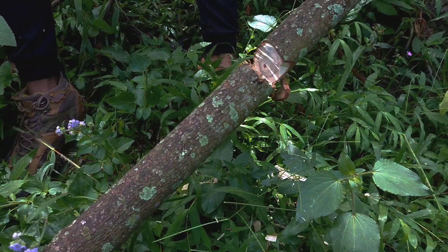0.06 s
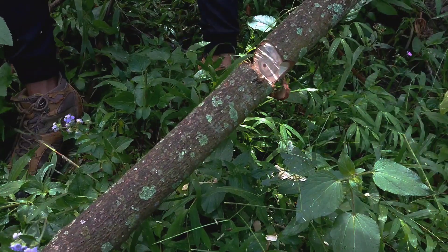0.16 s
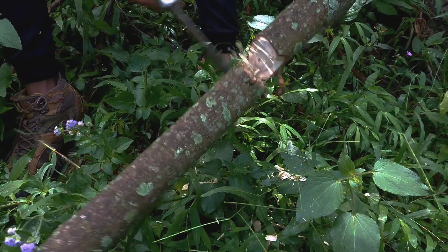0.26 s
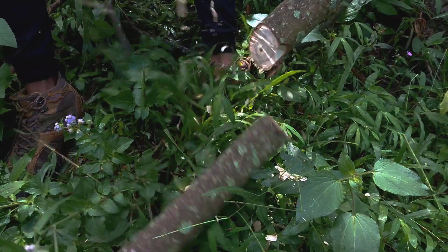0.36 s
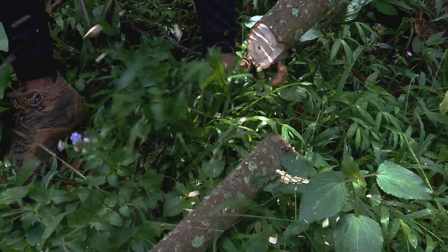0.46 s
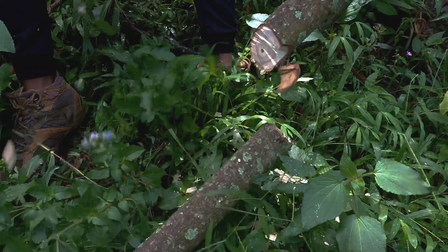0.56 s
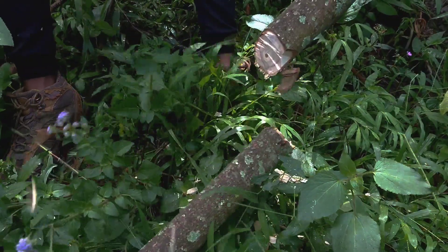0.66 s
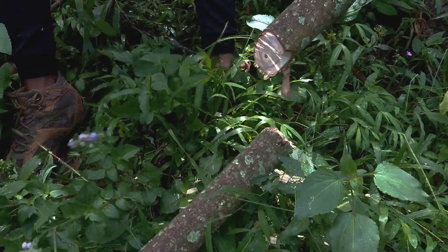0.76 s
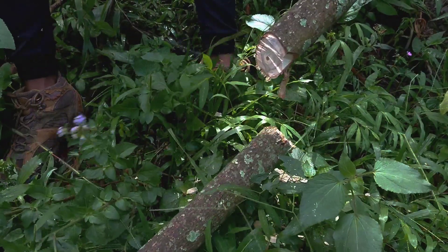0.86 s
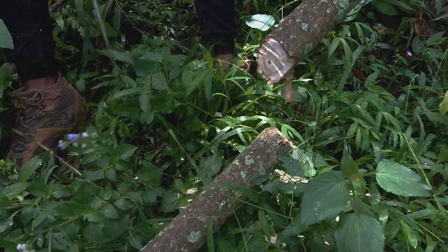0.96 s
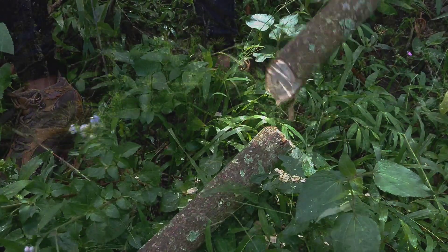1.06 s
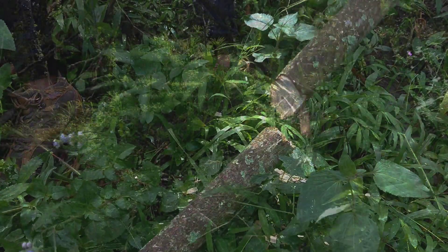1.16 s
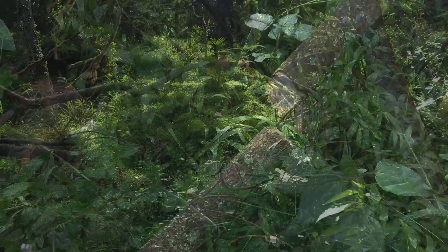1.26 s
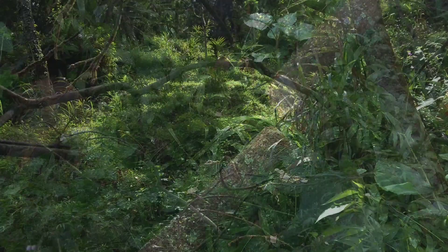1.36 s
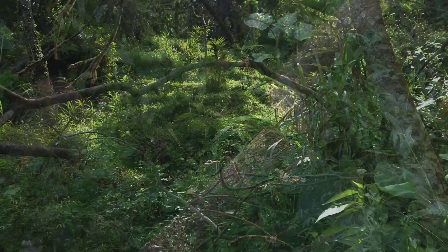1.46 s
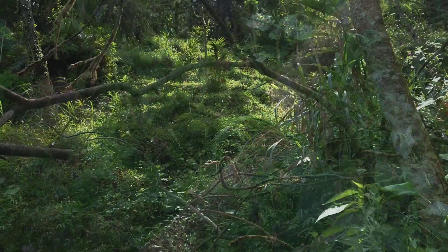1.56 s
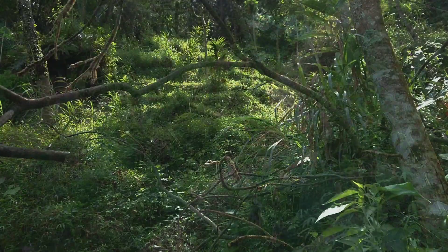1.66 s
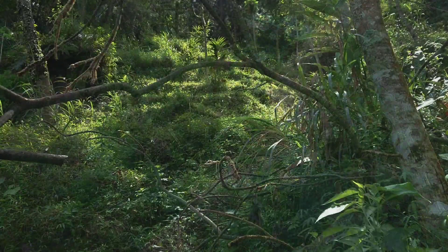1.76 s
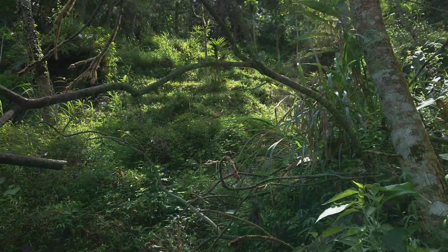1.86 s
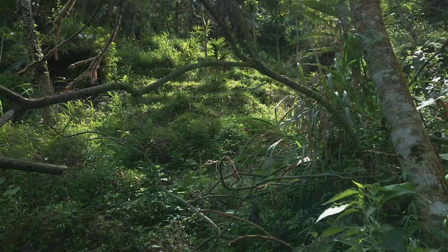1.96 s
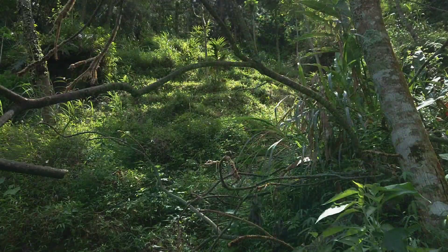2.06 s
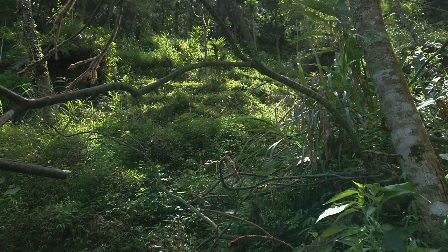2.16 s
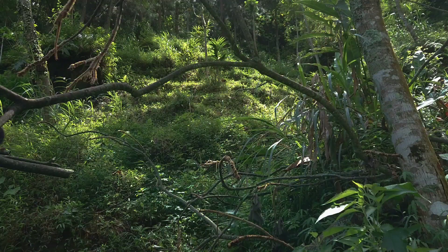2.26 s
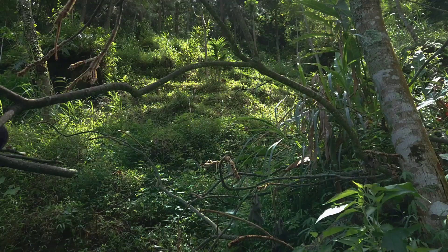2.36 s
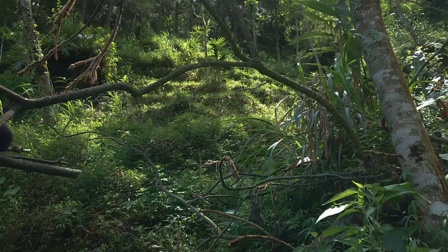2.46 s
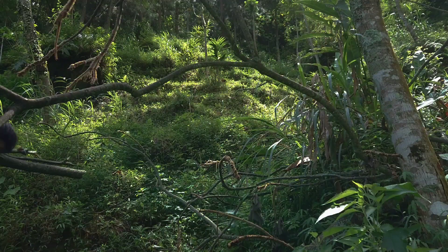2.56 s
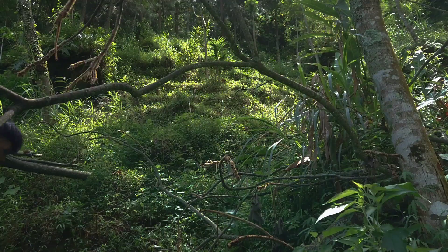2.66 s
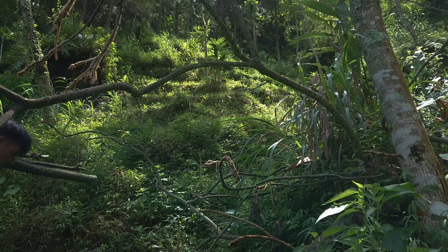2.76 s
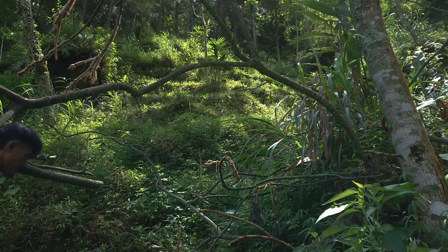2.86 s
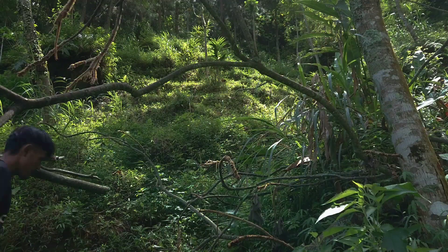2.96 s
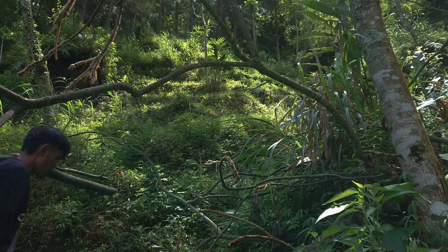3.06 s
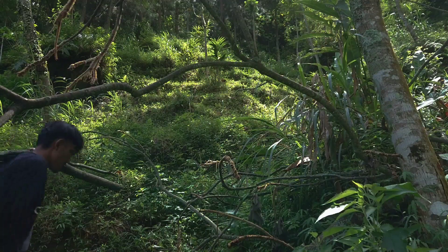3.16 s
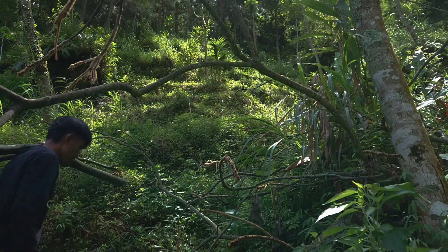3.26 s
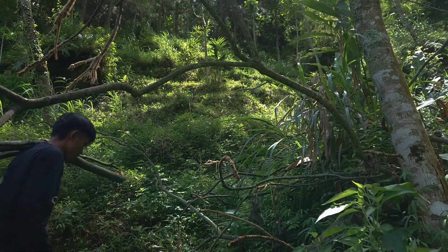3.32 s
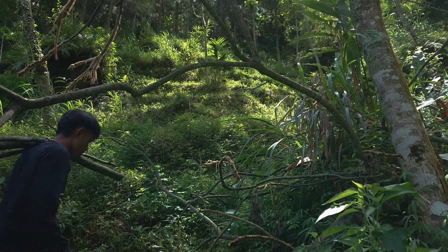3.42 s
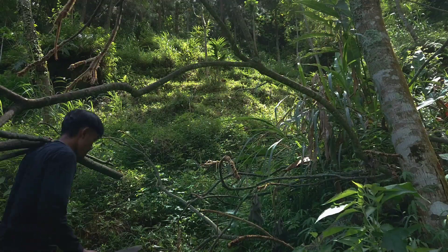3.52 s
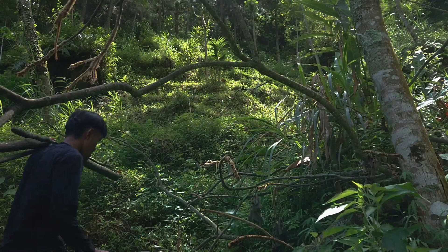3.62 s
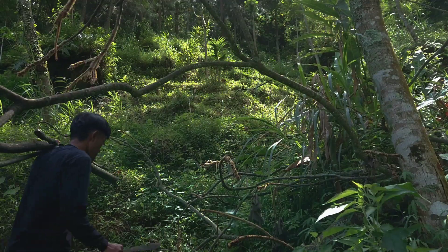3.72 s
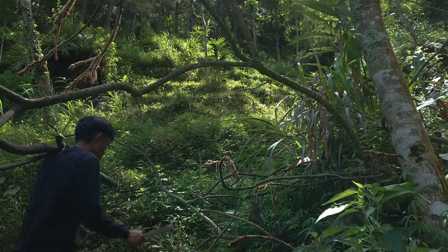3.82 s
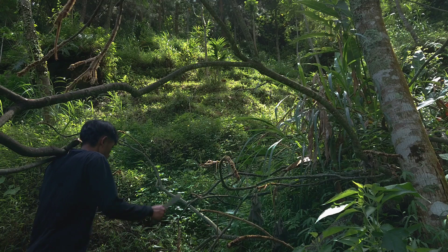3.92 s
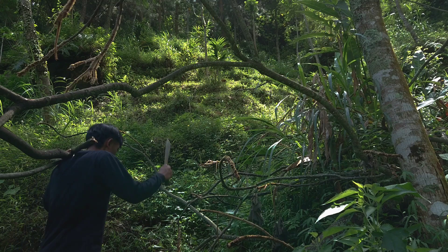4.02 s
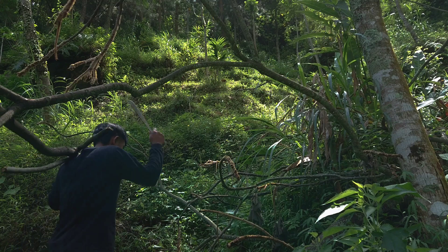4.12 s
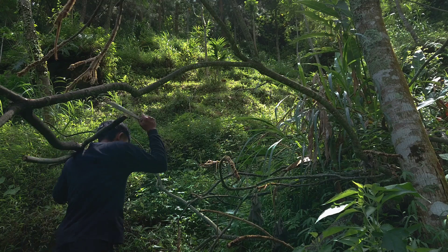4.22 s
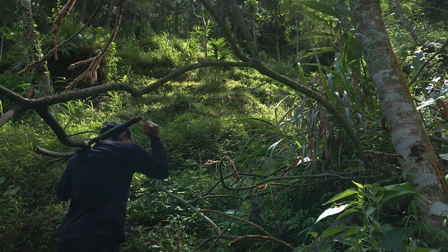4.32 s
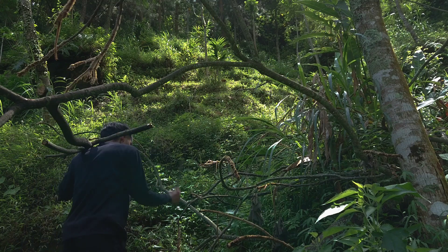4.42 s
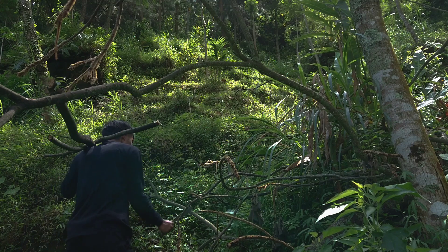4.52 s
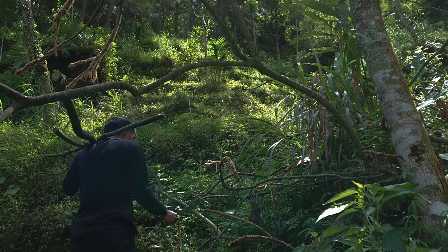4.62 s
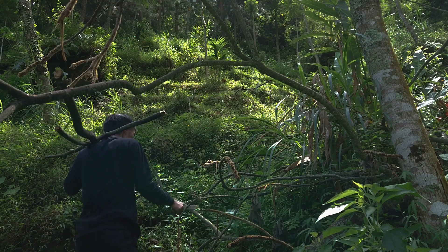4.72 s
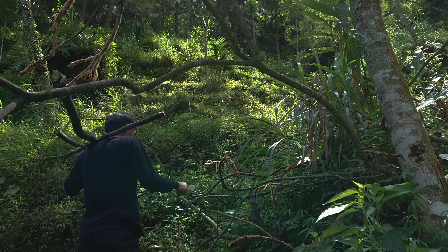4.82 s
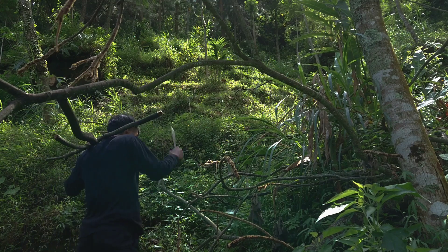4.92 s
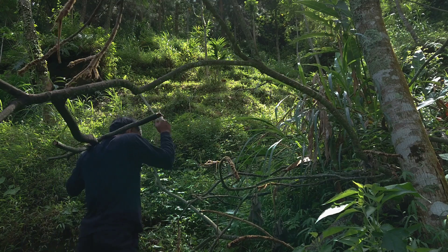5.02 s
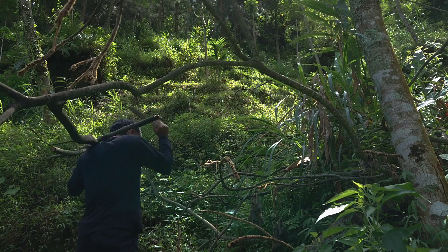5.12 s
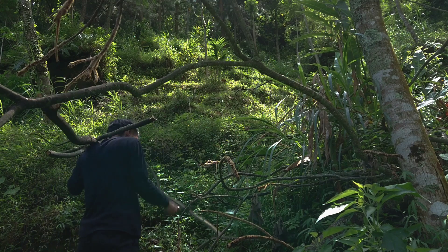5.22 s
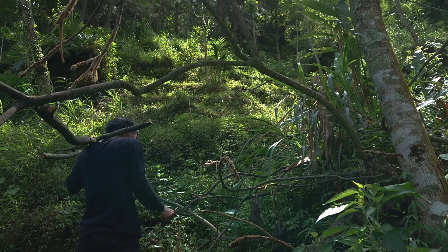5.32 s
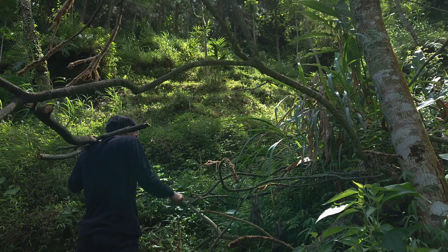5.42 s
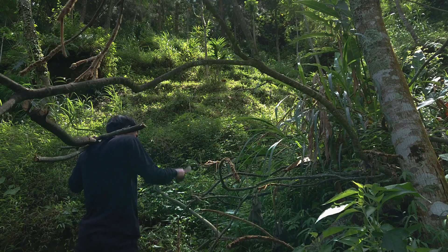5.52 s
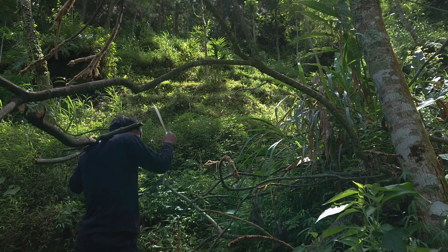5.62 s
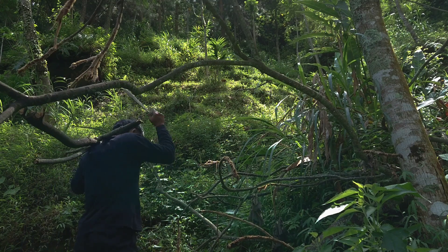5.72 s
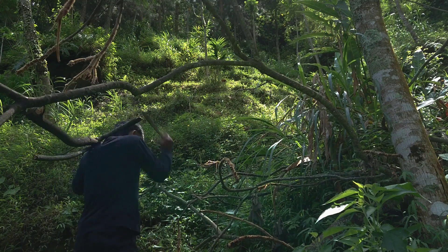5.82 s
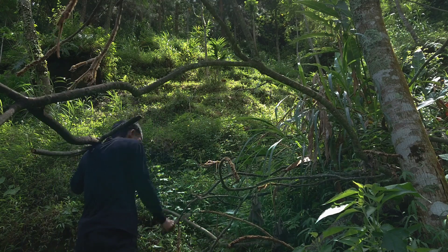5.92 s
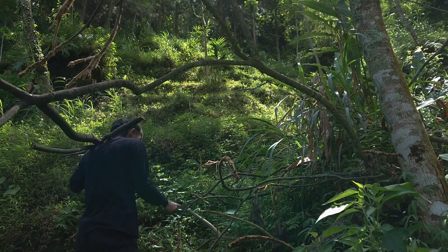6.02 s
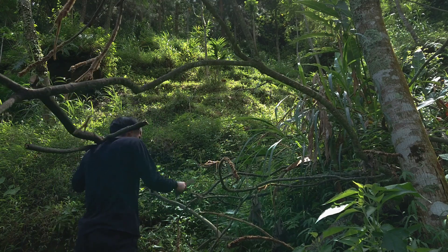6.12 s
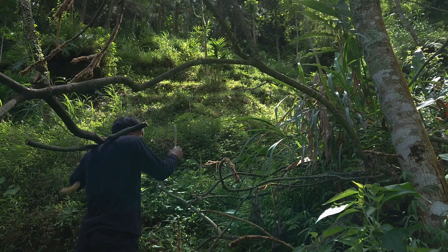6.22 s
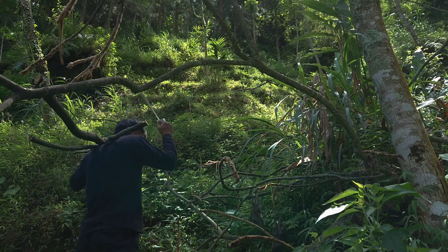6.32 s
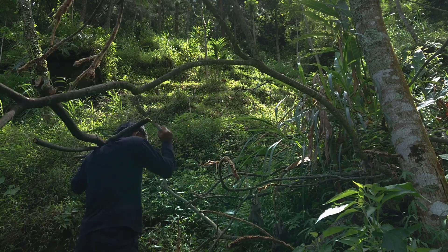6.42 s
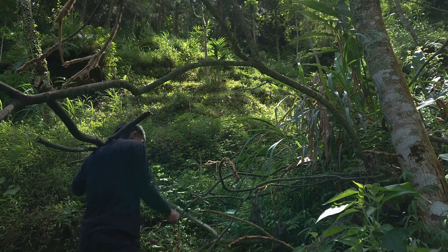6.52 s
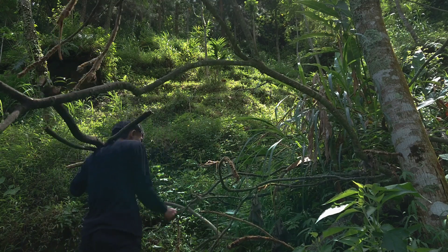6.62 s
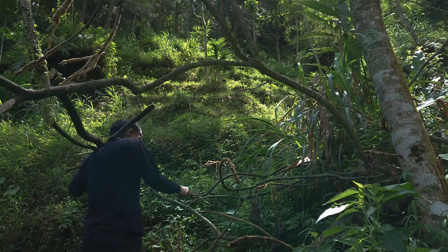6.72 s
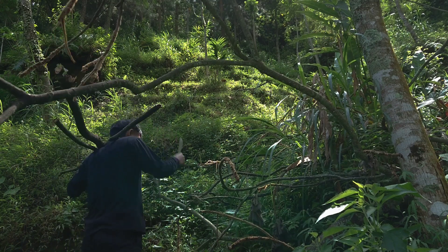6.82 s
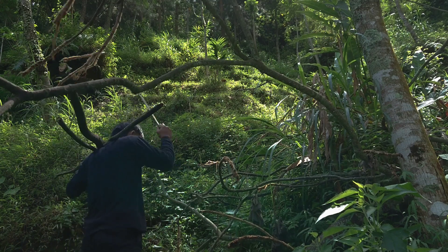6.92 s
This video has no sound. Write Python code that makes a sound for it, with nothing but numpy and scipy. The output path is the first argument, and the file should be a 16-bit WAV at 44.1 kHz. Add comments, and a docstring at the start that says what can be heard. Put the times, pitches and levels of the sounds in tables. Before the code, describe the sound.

A quiet forest wash opens, with a very faint rooster crowing far off to the right until about 1.2 seconds. At 0.4 seconds a machete cuts a sapling close by: fibres crack sharply, wood and blade ring briefly and the ground thuds. Leaves rustle and settle over the next second, and a small bird gives one faint chirp on the left near 1.5 seconds. At 1.7 seconds the background switches to another part of the forest, where a throbbing cicada chorus fades up, leaning left, over a faint wavering low hum. Foliage stirs softly between about 2 and 4 seconds. Four chops then bite into a branch a little further off, at about 4.6, 5.4, 6.1 and 6.7 seconds, each a woody crack with a short metallic ring and a shake of leaves. The cicadas continue to the end, near 7 seconds.

```python
"""A far rooster crows as a machete cuts a sapling close by: fibres crack, wood and blade ring, the
ground thuds. Leaves rustle and settle, and a small bird chirps. At 1.7 s the scene moves to another
part of the forest, with a throbbing cicada chorus on the left and a faint low drone. From 4.6 s, four
chops bite into a branch further off and shake its leaves.
Two spaced microphones: bass alike on both sides, treble mostly unlike."""
import sys
import numpy as np
from scipy import signal
from scipy.fft import rfft, irfft
from scipy.io import wavfile
from scipy.ndimage import uniform_filter1d

SR = 44100
rng = np.random.default_rng(int(sys.argv[2]) if len(sys.argv) > 2 else 0)


def dump_mix(stems):
    """Bounce the given channels to the path in sys.argv[1] as a 16-bit WAV at rate SR."""
    frames = np.atleast_2d(stems).T  # one column per channel
    limited = np.clip(frames, -1, 1)  # hard clip at full scale
    pcm = np.round(limited * 32767).astype(np.int16)
    wavfile.write(sys.argv[1], SR, pcm)


N = 307818
TIME_S = np.arange(N) / SR
PLACE_CHANGE_S = 1.699


def gain_of(db):
    """Decibels to gain."""
    return 10 ** (np.asarray(db) / 20)


def stereo(left_db, right_db):
    """Gain column for the two sides."""
    return gain_of([[left_db], [right_db]])


def unit_rms(x):
    """Scales to rms 1."""
    return x / np.sqrt(np.mean(x ** 2) + 1e-20)


def at_hz(points, hz):
    """Interpolates a table over log frequency."""
    point_hz, value = np.transpose(points)
    return np.interp(np.log(hz + 1), np.log(point_hz + 1), value)


def at_time(rows, t):
    """Interpolates each column of a table over time."""
    row_s, *columns = np.transpose(rows)
    return [np.interp(t, row_s, column) for column in columns]


def add(mix, start_s, sound):
    """Mixes in a stereo sound."""
    part = mix[:, round(start_s * SR):][:, :sound.shape[1]]
    part += sound[:, :part.shape[1]]


def wavering(rate_hz, waver, t):
    """A cosine whose rate drifts."""
    drift = unit_rms(sum(np.sin(2 * np.pi * (f * t + rng.random())) for f in np.geomspace(.5, 8, 12)))
    return np.cos(2 * np.pi * np.cumsum(rate_hz * (1 + waver * drift)) * (t[1] - t[0]))


def tone(curve, partials=((1, 0),), waver=0., flutter_db=0.):
    """An unsteady, soft-ended tone along (s, Hz, dB) points, with (multiple, dB) partials."""
    t = np.arange(curve[0][0], curve[-1][0], 1 / SR)
    hz, db = at_time(curve, t)
    noise = rng.standard_normal((2, len(t)))
    drift, flutter = unit_rms(uniform_filter1d(uniform_filter1d(noise, size=900), size=900))
    turns = np.cumsum(hz * (1 + waver * drift)) / SR
    wave = sum(gain_of(partial_db) * np.sin(2 * np.pi * k * turns) for k, partial_db in partials)
    soft_ends = signal.windows.tukey(len(t), min(1, 900 / len(t)))
    return np.sqrt(2) * gain_of(db + flutter_db * flutter) * wave * soft_ends


def syllable(start_s, length_s, first_hz, last_hz, level_db, change_db):
    """Tone curve of a bird's note: pitch and level hold at first, then slide."""
    progress = np.linspace(0, 1, 9)
    slide = progress ** 1.9
    hz = first_hz + (last_hz - first_hz) * slide
    return np.transpose([start_s + length_s * progress, hz, level_db + change_db * slide])


# Likeness of the two microphones. Each row: frequency in Hz, coherence from 0 to 1.
MIC_COHERENCE = [(100, .97), (300, .89), (600, .5), (1100, .2), (2000, .05), (8000, .03)]

def hiss(colour, size, lag_s=0., coherence=MIC_COHERENCE):
    """Stereo noise from random short-time spectra of gain colour(hz, t); the right side lags."""
    hop = size // 4
    hz, t = np.fft.rfftfreq(size, 1 / SR)[:, None], np.arange(N // hop + 5) * hop / SR
    re1, im1, re2, im2, patches = rng.standard_normal((len(t), len(hz), 5)).T
    patches = uniform_filter1d(patches, size // 64, axis=0)
    patches_db = .5 * unit_rms(uniform_filter1d(patches, 8192 // size, axis=1))
    shared = at_hz(coherence, hz)
    left = re1 + 1j * im1
    right = shared * left + np.sqrt(1 - shared ** 2) * (re2 + 1j * im2)
    right *= np.exp(-2j * np.pi * hz * lag_s)
    spectra = np.array([left, right]) * colour(hz, t) * gain_of(patches_db)
    return signal.istft(spectra, nperseg=size, noverlap=size - hop)[1][:, :N] / np.sqrt(8 * size / 3)


# Air spectrum of the first place. Each row: frequency in Hz, relative level in dB.
FIRST_AIR = [(25, -34), (40, -15), (60, -5.5), (130, -3.5), (220, -14), (400, -16.5), (700, -21.5),
             (1100, -24), (2000, -30.5), (4700, -30.5), (6500, -39.5), (8500, -43.5), (10500, -37.5),
             (15400, -38.5)]

def first_air():
    """Distant forest wash, fading by 13 dB a second after 1.05 s."""
    def colour(hz, t):
        level_db = -46 - 13 * np.maximum(t - 1.05, 0)
        return unit_rms(gain_of(at_hz(FIRST_AIR, hz))) * gain_of(level_db)
    return hiss(colour, size=2048)


# Crow syllables. Each row: start and length in seconds, first and last pitch in Hz,
# level and its change in dB.
CROW = [(.11, .08, 678, 680, -73, -4), (.215, .23, 686, 686, -71, 1.5), (.63, .17, 699, 694, -77, -1.5),
        (.85, .39, 692, 632, -71, -10)]

def rooster():
    """A far crow on the right, its octave stronger than its fundamental."""
    out = np.zeros((2, N))
    for row in CROW:
        note = tone(syllable(*row), partials=[(1, -1.5), (2, 0)], waver=.003, flutter_db=1.5)
        add(out, row[0], note * stereo(-2.5, 2.5))
    return out


# Spectrum of splitting wood. Each row: frequency in Hz, relative level in dB.
CRACK_SPECTRUM = [(150, -31.5), (300, -8), (1000, 1.2), (2000, -0.26), (3500, -3), (4400, -3), (6500, -9.5),
                  (8500, -18), (10000, -13.5), (12000, -12.5), (14300, -19.5), (16300, -27)]
# Blade bites and fibre snaps. Each row: start in seconds, level in dB, tilt in dB per octave,
# t60 in seconds, relative tail in dB, left over right in dB, pitch in Hz.
FIBRE_CRACKS = [(0.3983, -3, 2.3, 0.016, -16, 1, 2650), (0.4007, 1.5, -0.3, 0.012, -33, -1, 1200),
                (0.403, -2.5, .1, 0.014, -29, 7, 4200), (0.4074, .5, 4.5, 0.0063, -27, -9, 4300),
                (0.4098, -11, .1, .01, -28, 8, 4110), (0.4991, -35, -1, 0.0076, -15, -2.1, 2230),
                (0.924, -48, 1.5, 0.0099, -12, 2, 2640), (1.048, -51, 3.5, 0.01, -16, 1, 9960),
                (4.6245, -5.5, -2, 0.0087, -18, 0.4, 2323), (5.4033, -5, -.1, 0.0095, -16, -1.7, 2172),
                (5.4084, -12, -6.5, 0.0093, -29, 11, 1900), (6.0765, -8, .5, 0.0078, -13, -0.3, 1900),
                (6.0775, -12, 1.5, .007, -16, .3, 6200), (6.6992, -5, -1, 0.0095, -18.5, 2.5, 1500),
                (6.7146, -29, 4, 0.0053, -11, 2.1, 11300), (6.788, -34, 0, 0.0077, -10, -1, 4360)]

def cracks():
    """Fibres split in noise bursts, each with a short tail scattered by trunks and ground."""
    out, size = np.zeros((2, N)), 6000
    t, hz = np.arange(size) / SR, np.fft.rfftfreq(size, 1 / SR)
    attack = (1 - np.exp(-t / .0007)) ** 2
    for start_s, level_db, tilt, t60, tail_db, pan_db, pitch_hz in FIBRE_CRACKS:
        both, left, right = rng.standard_normal((3, size))
        bump_db = 7.1 * np.exp(-(np.log2((hz + 50) / pitch_hz) / .43) ** 2)
        colour = gain_of(at_hz(CRACK_SPECTRUM, hz) + tilt * np.log2((hz + 50) / 3000) + bump_db)
        noise = unit_rms(irfft(rfft(np.array([left, right]) + .63 * both) * colour))
        decay = gain_of(-60 * t / t60) + gain_of(tail_db - 60 * t / .064)
        add(out, start_s, noise * attack * decay * gain_of(level_db) * stereo(pan_db / 2, -pan_db / 2))
    return out


def ring(modes, level_db, left_lag_ms, build_cycles=1.7):
    """Struck modes build and die away; each side hears them at a slightly different phase."""
    t = np.arange(9000) / SR
    hz, db, t60 = np.transpose(modes)[:, :, None]
    phase = rng.uniform(0, 2 * np.pi, hz.shape)
    skew = .1 * rng.standard_normal(hz.shape)
    choke_db = 150 * (t / t60) ** 3  # green wood and the grip damp the late ring
    attack = (1 - np.exp(-t * hz / build_cycles)) ** 2
    envelope = attack * gain_of(level_db + db - 60 * t / t60 - choke_db)
    left = np.sin(2 * np.pi * hz * (t - left_lag_ms / 1000) + phase + skew)
    right = np.sin(2 * np.pi * hz * t + phase)
    return (envelope * np.array([left, right])).sum(axis=1)


# Modes of the struck bodies. Each row: frequency in Hz, relative level in dB, base t60 in seconds.
SAPLING_MODES = [(125, -8.5, .09), (174, -5, .09), (243, -11, .11), (345, -7, 0.04), (452, -1, .11),
                 (620, 4, 0.046), (740, 3, .06), (880, 2.5, .05), (1137, 9, .025)]
BRANCH_MODES = [(152, -2.5, 0.091), (226, -13, 0.13), (286, -6, 0.13), (350, -3, 0.12), (412, -9, .1),
                (457, -5, 0.1), (528, -4, 0.09), (607, -5, 0.06), (672, -4, 0.05)]
BLADE_MODES = [(790, -3.04, .15), (960, -3.5, .07), (1394, 1.7, 0.033), (1800, -6.5, 0.032),
               (2480, -9.5, .04), (2870, -14, 0.022), (3450, -14.5, .025), (4250, -18.5, .03)]
GROUND_MODES = [(65, 4.2, .25), (95.5, -1.0, .38)]
# Machete blows. Each row: start in seconds, wood, blade and ground levels in dB, left lag in ms,
# blade t60 factor, blade treble cut in dB per octave.
MACHETE_BLOWS = [(.399, -21.5, -30, -42, 0.096, 0.66, 4), (.422, -41, -54.5, -67, -0.26, 1.01, 1.5),
                 (4.625, -21.5, -19.5, -36, 0.16, .95, -1), (5.404, -23, -28.5, -36.5, 0.11, 1.3, 3),
                 (5.432, -32.5, -29.5, -57, 0.23, 0.75, 6), (6.079, -23, -16.5, -38.5, 0.18, 0.87, 1.5),
                 (6.701, -26, -18, -35, 0.1, 0.65, -3), (6.752, -46, -43, -56, 0.11, 0.74, 1),
                 (6.758, -43, -37, -45, .15, .6, 2), (6.764, -41, -33, -38, .2, .5, 2)]

def blows():
    """Each blow rings the wood (sapling, later branch) and the blade, and jolts the ground."""
    out = np.zeros((2, N))
    for start_s, wood_db, blade_db, ground_db, lag_ms, t60_factor, treble_cut in MACHETE_BLOWS:
        wood, build_cycles = (SAPLING_MODES, .6) if start_s < PLACE_CHANGE_S else (BRANCH_MODES, 1.1)
        blade = [(hz, db - treble_cut * np.log2(hz / 800), t60 * t60_factor)
                 for hz, db, t60 in BLADE_MODES]
        add(out, start_s, ring(wood, wood_db, lag_ms, build_cycles))
        add(out, start_s, ring(blade, blade_db, lag_ms))
        add(out, start_s, ring(GROUND_MODES, ground_db, left_lag_ms=0))
    return out


# Leaf spectrum. Each row: frequency in Hz, relative level in dB.
LEAF_SPECTRUM = [(200, -30), (400, -8.5), (800, -6.5), (1200, -10.5), (2500, -6.5), (4300, -7),
                 (6500, -13.5), (8500, -15), (10000, -10.5), (15000, -9.5), (16000, -23)]
# Leaves shaken or brushed. Each row: peak time in seconds, level in dB, tilt in dB per octave,
# seconds per 20 dB of rise, t60 in seconds.
LEAF_RUSTLES = [(.43, -36, 1.2, .01, .4), (.504, -40.5, -1.6, .18, .6), (.6, -50, .8, .2, 1.6),
                (1.05, -60, -1.5, .02, .5), (1.19, -66, -5, .08, .8), (2.25, -61, 4, .06, 2.5),
                (3.0, -58, 6, .25, 1.2), (3.44, -53, -3.5, .3, .45), (3.96, -50, 3, .2, .2),
                (4.64, -40, -6, .015, .26), (4.78, -49, -1.5, .2, .28), (5.42, -41, -.8, .015, .42),
                (6.1, -39.5, .2, .015, .6), (6.19, -47, -1, .15, .3), (6.72, -41, 2.7, .015, .42),
                (6.8, -55, 4, .1, .7)]

def leaves():
    """Many leaf touches merge into wide noise that swells, flickers and dies away."""
    def colour(hz, t):
        peak_s, db, tilt, rise_s, t60 = np.transpose(LEAF_RUSTLES)[:, :, None]
        swell_db = db + np.where(t < peak_s, 20 * (t - peak_s) / rise_s, -60 * (t - peak_s) / t60)
        power = gain_of(2 * tilt.T * np.log2((hz + 50) / 8000)) @ gain_of(2 * swell_db)
        flicker_db = 1.5 * rng.standard_normal(len(t))
        return unit_rms(gain_of(at_hz(LEAF_SPECTRUM, hz))) * np.sqrt(power) * gain_of(flicker_db)
    return hiss(colour, size=256)


def chirp():
    """One quick falling note from a small bird on the left."""
    out, start_s = np.zeros((2, N)), 1.46
    curve = syllable(start_s, length_s=.038, first_hz=5450, last_hz=4450, level_db=-70, change_db=-4)
    add(out, start_s, tone(curve) * stereo(2.2, -3))
    return out


# Fade-in of the second place. Each row: time in seconds, share of the opening dip left.
OPENING_DIP = [(1.7, 1), (1.8, .65), (2.05, .75), (2.35, .1), (2.7, 0)]

def fade_in(t, from_db):
    """Gain rising unevenly from from_db to unity."""
    return gain_of(from_db * at_time(OPENING_DIP, t)[0])


# Air spectrum of the second place. Each row: frequency in Hz, relative level in dB.
SECOND_AIR = [(25, -36), (40, -36.5), (62, -2), (105, -2.5), (180, -10), (300, -14), (600, -17.5),
              (1100, -22), (2000, -31), (4700, -21), (6500, -36.5), (9000, -36), (12000, -34.5),
              (15400, -37)]

def second_air():
    """Distant forest wash, fading up."""
    def colour(hz, t):
        return unit_rms(gain_of(at_hz(SECOND_AIR, hz))) * gain_of(-43.5) * fade_in(t, from_db=-5.5)
    return hiss(colour, size=2048, lag_s=.00022)


def bands(table, hz):
    """Sum of steep resonances, mean power 1."""
    return unit_rms(sum(gain_of(db) / (1 + (2 * (hz - f) / width) ** 2) for f, width, db in table))


# Cicada resonances. Each row: centre in Hz, width in Hz, relative level in dB.
MAIN_BANDS = [(2863, 700, -3), (3920, 620, -19), (4540, 180, 1.5), (4650, 910, -3), (5500, 1650, -4),
              (6600, 730, -16)]
LOW_BANDS = [(3700, 250, -6), (3900, 220, -1), (4060, 110, 0), (4400, 200, -4)]
HIGH_BANDS = [(8320, 280, -1), (10190, 2600, 5.7), (11400, 4300, -3.5)]
# Phrases of one near cicada. Each row: start in seconds, low band level in dB, overtone dip scale in dB.
CICADA_PHRASES = [(1.9, -1.5, -5.5), (2.891, -3, -4.5), (3.66, -2.5, -7.5), (4.44, -2.5, -9),
                  (5.25, -3.5, -10), (6.17, -4, -10), (6.93, -3, -10)]
CHORUS_DB, CHORUS_FADE_DB, CHORUS_LAG_SAMPLES = -50.6, -10, 18

def cicadas():
    """Drumming membranes buzz in throbbing bands; each phrase opens low and dull, then climbs."""
    def colour(hz, t):
        start_s, low_db, dip_db = np.transpose(CICADA_PHRASES)[:, :, None]
        age_s = t - start_s
        low_decay = gain_of(low_db - 5.1 * np.clip(age_s / .4, 0, 3) ** 2)
        low_swell = (low_decay * np.clip(age_s / .025, 0, 1)).max(axis=0)
        dip = np.clip(age_s / .087, 0, 1) * np.clip(1 - age_s / .53, 0, 1)
        drop_hz = 150 * (dip.sum(axis=0) - .4)
        throb = wavering(rate_hz=25, waver=.05, t=t)
        low = bands(LOW_BANDS, hz) * low_swell
        main = bands(MAIN_BANDS, hz + drop_hz) * gain_of(1.2 * throb)
        high = bands(HIGH_BANDS, hz) * gain_of(-4.5 + (dip_db * dip).sum(axis=0) + 2.1 * throb)
        level = gain_of(CHORUS_DB) * fade_in(t, CHORUS_FADE_DB)
        return np.sqrt(low ** 2 + main ** 2 + high ** 2) * level
    buzz = unit_rms(1 + .25 * wavering(rate_hz=342, waver=.06, t=TIME_S))
    coherence = [(3000, .68), (5500, .18), (10000, .27)]
    chorus = hiss(colour, size=512, lag_s=CHORUS_LAG_SAMPLES / SR, coherence=coherence)
    return chorus * buzz * stereo(2.5, .8)


# Fine lines within the cicada chorus. Each row: pitch in Hz, level in dB.
CICADA_LINES = [(2940, -78), (4060, -76), (4420, -72), (4600, -72), (4790, -73), (5020, -75)]

def shrill_lines():
    """Thin unsteady tones shrilling within the chorus, reaching the left side first."""
    lines = sum(tone([(0, hz, db), (N / SR, hz, db)], waver=.006, flutter_db=4.5)[:N]
                for hz, db in CICADA_LINES)
    lines *= fade_in(TIME_S, CHORUS_FADE_DB)
    return np.array([lines, np.roll(lines, CHORUS_LAG_SAMPLES)]) * stereo(0, -3)


# Course of the drone. Each row: time in seconds, pitch in Hz, level in dB.
DRONE_CURVE = [(1.7, 147, -62), (2.05, 144, -57), (2.4, 145, -50.5), (2.8, 143, -54), (3.35, 143.4, -54),
               (3.56, 141, -62), (4.05, 139.8, -53), (4.4, 139.4, -59.5), (5.6, 138.5, -60),
               (6.1, 143, -66), (6.98, 141, -62)]

def drone():
    """A faint low hum, wandering in pitch and level."""
    out = np.zeros((2, N))
    hum = tone(DRONE_CURVE, partials=[(1, 0), (2, -16), (3, -21)], waver=.0054, flutter_db=2.2)
    add(out, DRONE_CURVE[0][0], hum * stereo(.5, -.5))
    return out


def scene():
    """The background switches abruptly between places, under the birds, chops and leaves."""
    first = first_air()
    second = second_air() + cicadas() + shrill_lines() + drone()
    switch = np.clip((TIME_S - PLACE_CHANGE_S) / .0022, 0, 1)
    background = ((1 - switch) * first + switch * second) * stereo(.6, -.6)
    return background + cracks() + blows() + rooster() + chirp() + leaves()


def record(dry):
    """A narrow notch from the microphone housing, gentle overload, then the band limit."""
    notch_hz, width_hz, depth, edge_hz = 7600, 330, .92, 15750
    hz = np.fft.rfftfreq(N, 1 / SR)
    notch = 1 - depth * np.exp(-((hz - notch_hz) / width_hz) ** 2)
    notched = irfft(rfft(dry) * notch, N)
    rounded = .9 * np.tanh(notched / .9)
    lowpass = signal.firwin(511, edge_hz, window=("kaiser", 9), fs=SR)
    return signal.oaconvolve(rounded, lowpass[None], "same")


dry = scene()
out = record(dry)
dump_mix(out)
```